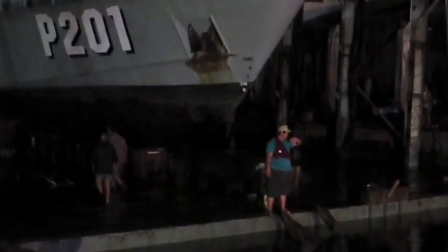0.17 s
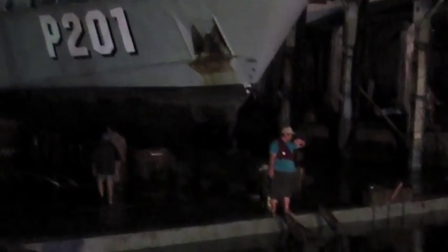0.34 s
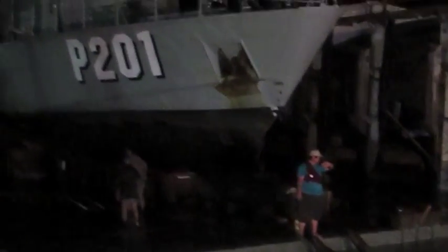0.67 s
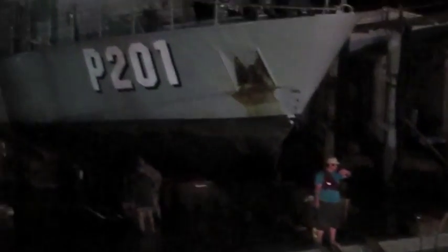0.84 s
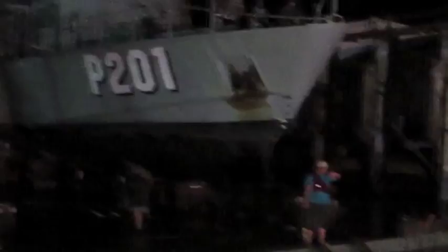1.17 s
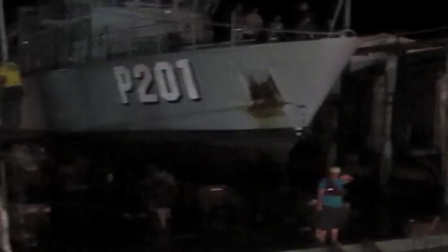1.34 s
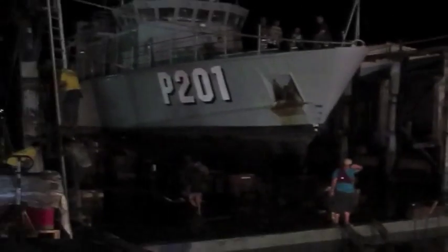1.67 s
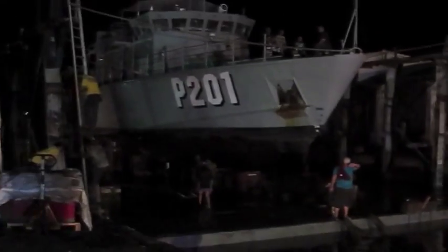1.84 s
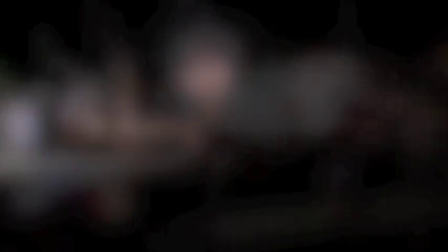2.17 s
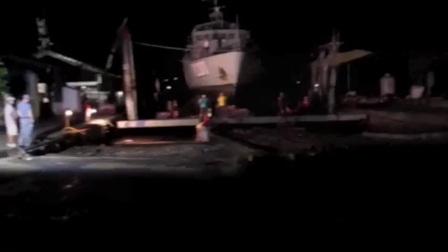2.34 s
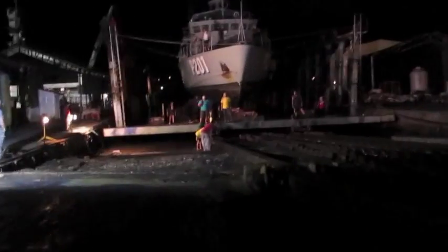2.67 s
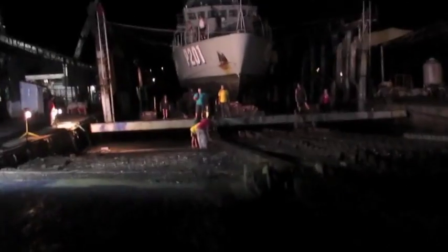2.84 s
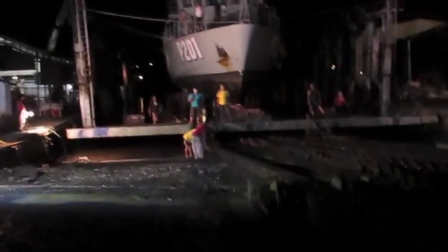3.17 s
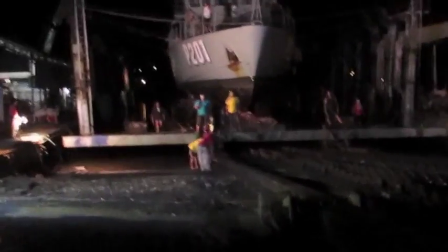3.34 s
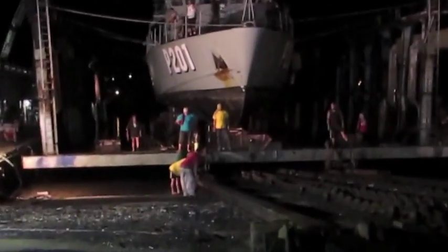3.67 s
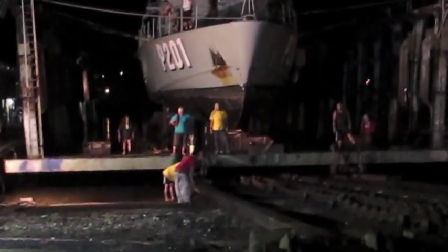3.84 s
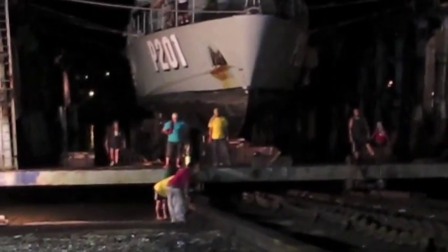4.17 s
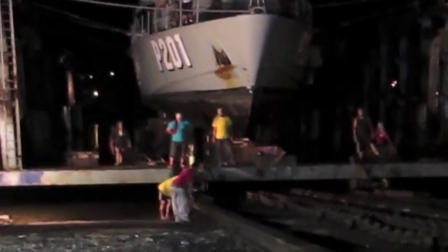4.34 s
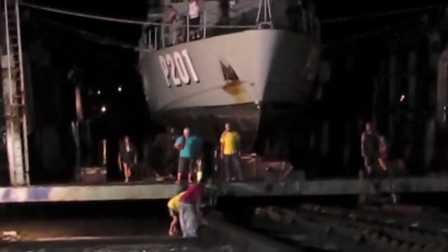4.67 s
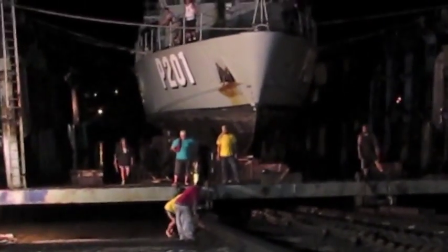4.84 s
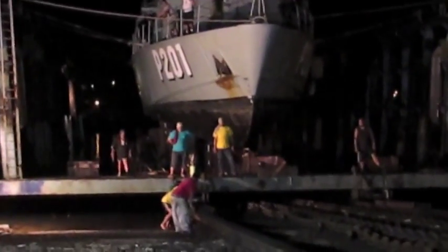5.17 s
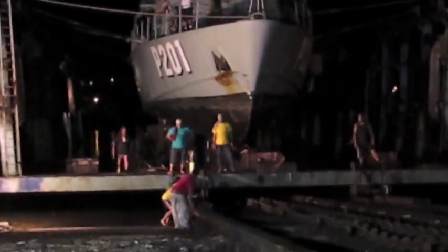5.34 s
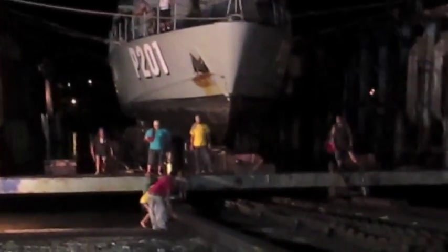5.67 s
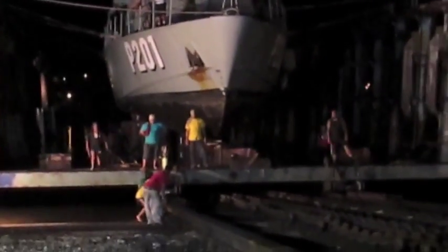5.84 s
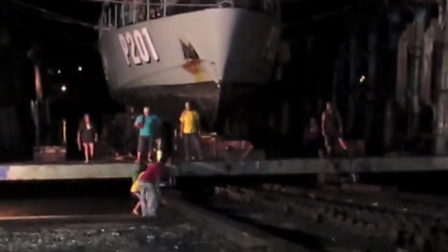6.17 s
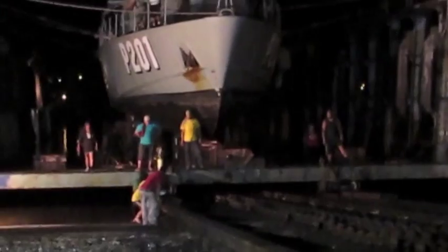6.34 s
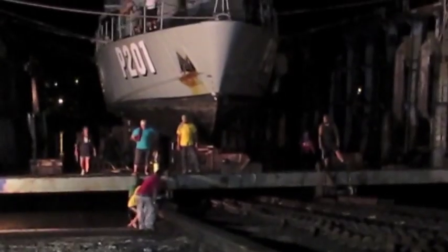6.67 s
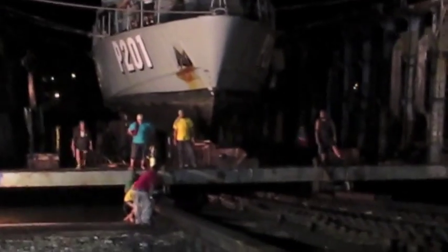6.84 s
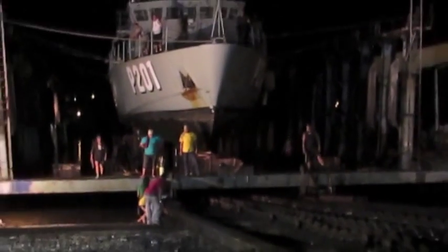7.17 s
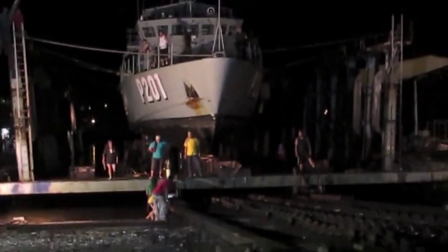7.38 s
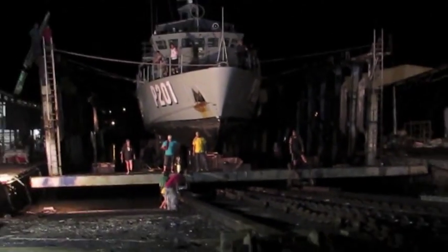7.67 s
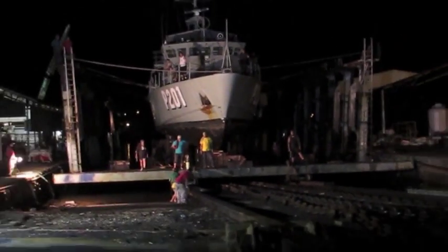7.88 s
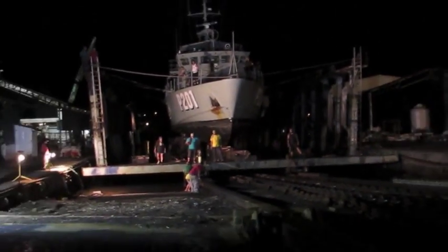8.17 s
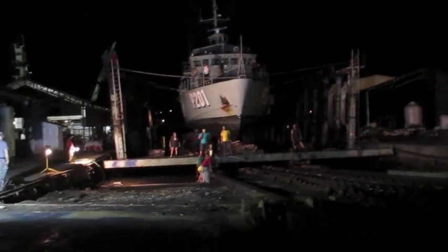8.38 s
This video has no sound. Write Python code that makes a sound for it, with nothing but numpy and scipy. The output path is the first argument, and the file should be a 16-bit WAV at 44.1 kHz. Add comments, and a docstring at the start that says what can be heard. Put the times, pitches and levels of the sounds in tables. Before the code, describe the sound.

Outdoors at a shipyard slipway, a close winch roar with a hollow drone quickly fades to a distant rush while wind thuds and flutters on the microphones, mostly the left. Small dry ticks of fingers on the camera follow. Around two seconds the sound crossfades to a heavy winch close by, roaring steadily with a wavering mid-pitched whine. One loud click comes later; the winch continues unbroken.

```python
"""Winch on a windy slipway

A loud winch close by fades to a distant rush and a few tones, with wind buffeting both microphone ports.
Then the close winch fades in: shaped noise for motor, gears and air, sine tones for drive and gear mesh.
Fingers tick on the camera body (ringing modes and a noise crack), with a steady hum and hiss underneath.
Sharp bright peaks pull the recorder's gain down for a moment.
"""
import sys
import numpy as np
from scipy import signal
from scipy.fft import rfft, irfft, next_fast_len
from scipy.io import wavfile

SR = 44100
rng = np.random.default_rng(int(sys.argv[2]) if len(sys.argv) > 2 else 0)


def file_out(sig):
    """Save sig as 16-bit WAV at sys.argv[1]."""
    # one column per channel
    cols = np.atleast_2d(sig).T
    # limit, then scale
    lim = np.clip(cols, -1, 1)
    pcm = np.round(lim * 32767).astype(np.int16)
    wavfile.write(sys.argv[1], SR, pcm)


N = 375291

# Noise of the close winch, only its shape counts: (frequency [Hz], relative level per Hz [dB])
ROAR_SPECTRUM = [(20, -21), (60, -11), (120, -2.5), (200, 1), (500, -4), (900, -9), (1800, -14.5),
                 (2900, -26.5), (5300, -28), (7000, -34), (9000, -42.5), (11000, -53), (14000, -64.5),
                 (15300, -69)]
# Tones of the drive: (multiple of the shaft rate [-], level against the close roar [dB])
DRIVE_TONES = [(2, -27.5), (6, -25.5), (8, -19), (11, -24.5), (14, -21), (19, -22), (20, -24.5), (22, -24),
               (32, -32), (34, -43), (36, -31.5), (37, -39), (38, -36), (39, -35.5), (40, -26.5), (53, -40),
               (54, -26)]
# Close tones unrelated to the shaft: (frequency [Hz], level against the close roar [dB], pitch wander [Hz])
OTHER_TONES = [(41.4, -36, 1.1), (80.9, -18.5, 0.67), (161.5, -20.5, 1.54), (190.9, -14.5, 1.89),
               (423.7, -14.5, 2.5), (466, -12.5, 12), (8600, -54, 9.1)]
# Hollow band of noise in the opening: (frequency [Hz], level against the opening roar [dB], width [Hz])
OPENING_DRONE = (790, -13, 77)
# Noise of the distant winch, only its shape counts: (frequency [Hz], relative level per Hz [dB])
RUSH_SPECTRUM = [(60, -7), (300, 6.5), (700, -1), (900, -5), (1400, -5.5), (1800, -9.5), (2900, -16),
                 (4000, -21), (5300, -19), (7000, -23.5), (9000, -32), (11000, -48.5), (14000, -53),
                 (15300, -59)]
# Tones that carry to the far place: (frequency [Hz], level against the far rush [dB], pitch wander [Hz])
FAR_TONES = [(1375, -24, 2.5), (1615, -19.5, 2.0)]
# Brief extra treble in the rush:
# (centre [s], time to fall by a factor e [s], treble added against the rush's own [dB], above [Hz])
TREBLE_SWELL = (.24, .05, 2.2, 2600)
# Gusts on the two microphone ports: (time [s], left level [dB], right level [dB])
GUSTS = [(0.0, -20, -17), (0.07, -23, -24), (0.14, -24, -30), (0.21, -16, -28), (0.28, -14, -20.8),
         (0.35, -15.5, -26), (0.42, -17.5, -25.6), (0.49, -19.5, -22), (0.56, -19, -24), (0.63, -17, -22),
         (0.7, -17.5, -24), (0.77, -19, -30), (0.84, -23, -20), (0.91, -22.3, -20.5), (0.98, -19, -26),
         (1.05, -18, -25), (1.12, -21.5, -37), (1.19, -20, -28), (1.26, -22, -25), (1.33, -16, -27),
         (1.4, -15.5, -16.5), (1.47, -15, -14.5), (1.54, -15, -19), (1.61, -14.5, -25), (1.68, -18.5, -18),
         (1.75, -20.5, -26), (1.82, -16, -19), (1.89, -22, -21.5), (1.96, -16.5, -11.5), (2.03, -22.5, -31),
         (2.1, -18, -16), (2.17, -27, -24), (2.3, -27, -40)]
# Noise of the wind, only its shape counts: (frequency [Hz], relative level per Hz [dB])
BUFFET_SPECTRUM = [(15, -10), (30, -10), (80, -0.5), (140, -2.5), (220, -7), (330, -12.5), (500, -23.5),
                   (800, -41), (1500, -49), (3000, -75)]
# Single hard puffs of wind: (time of the deepest swing [s], peak [dB], left over right [dB],
# swing frequency [Hz], direction: 1 pushes in, -1 sucks out [-])
PUFFS = [(0.19, -5.5, 20, 91, 1), (0.227, -7, 20, 85, -1), (.26, -9, 20, 150, 1), (0.284, 0, 13, 118, -1),
         (0.326, -2.5, 26, 88, -1), (.534, -6, 15, 100, 1), (0.663, -1, 22, 95, -1), (.739, 0, 26, 110, 1),
         (0.812, -8, 20, 120, -1), (0.901, -10, -14, 100, 1), (0.999, -4, 22, 130, 1),
         (1.362, -6, 14, 150, -1), (1.418, -7, 10, 130, -1), (1.462, -9, -1, 130, 1), (1.51, -5, 4, 110, 1),
         (1.54, -2, 14, 120, 1), (1.589, -6.5, 14, 140, 1), (1.626, -6.5, 10, 170, -1),
         (1.71, -8.5, 4, 114, 1), (1.788, -4.5, 12, 100, -1), (1.806, -5, 12, 100, -1),
         (1.829, -8, 14, 125, 1), (1.943, -3, -12, 109, -1)]
# Gear-mesh tone close by, before its quick flutter: (time [s], rms level [dB])
WHINE_LEVEL = [(2.2, -25.5), (2.55, -19.5), (2.85, -20), (2.97, -23), (3.05, -21.5), (3.35, -23),
               (3.42, -21), (3.55, -27), (4.06, -22.5), (4.22, -24.5), (4.28, -22), (4.91, -20),
               (4.98, -19.5), (5.03, -20), (5.65, -19.5), (5.86, -22.5), (6.08, -19), (6.32, -23),
               (6.45, -18), (6.95, -24.5), (7.6, -20.5), (7.81, -19.5), (8.27, -19), (8.51, -20.5)]
# A neighbouring tone that swells: (start [s], end [s], frequency [Hz], rms level when full [dB])
TONE_SWELL = (2.97, 3.26, 658, -28.5)
# Ticks on the camera body: (time [s], peak before gain control [dB], brightness [dB per octave],
# time for the rattle to fall 60 dB [s], place struck: 0 edge, 1 top, 2 side [-])
TICKS = [(.7305, -23, -5, .015, 0), (.795, -34, 0, .05, 0), (.882, -25, 0, .025, 0),
         (.938, -25, 2, .025, 0), (1.034, -30, 1, .08, 0), (1.063, -5, 0, .02, 1),
         (3.7467, 0.5, -2, .014, 2)]
# Ringing modes of the camera body: (frequency [Hz], time to fall 60 dB [s],
# edge left [dB], edge right [dB], top left [dB], top right [dB], side left [dB], side right [dB])
BODY_MODES = [(1120, .008, -14, -8, -13, -2, -20, -20), (2050, .007, -9, -9, -6, -12, -4, -9),
              (2400, .007, -3, -1, -2, -14, -5, 0), (2780, .008, -9, -2, -10, -1, -18, 0),
              (3700, .006, -9, -8, -15, -18, -5, -26), (4200, .007, -18, -5, -18, -10, -20, -20),
              (4750, .006, -17, -11, -18, -22, -20, -4), (5500, .005, -9, -13, -18, -16, -12, -4),
              (6300, .005, -16, -9, -16, -6, -23, -14), (8250, .004, -32, -17, -22, -1, -36, -13),
              (9200, .004, -36, -13, -27, -13, -40, -18), (10000, .004, -38, -22, -34, -18, -40, -18),
              (11000, .003, -40, -28, -34, -20, -44, -28), (13300, .002, -44, -36, -32, -24, -48, -14)]
# The two microphone ports:
# (frequency [Hz], left over right [dB], likeness from 0 to 1 [-], phase by which right leads [radians])
PORTS = [(60, 0, 1, 0), (500, -.5, .98, .12), (1200, -.5, .9, .2), (2100, 0, .78, .3),
         (2700, 2.5, .27, 1.0), (3200, 2.5, .5, .8), (3800, 2.5, .27, 1.3), (5000, 2.4, .35, 2.4),
         (6000, 3.7, .42, 3.3), (7000, -1.2, .38, 4.4), (8000, -7.8, .3, 5.2), (9000, -12, .2, 4.6),
         (10000, -13.4, .16, 4.3), (12000, -12, .07, 4.3), (14500, -9, .03, 4.3)]
# Fade from the far place to the close one: (start [s], end [s])
CROSSFADE = (1.97, 2.56)

SHAFT_HZ, MESH_ORDER = 29.9, 18   # the gear mesh sounds at 18 times the shaft rate
OPENING_FADE_START_S, OPENING_FADE_END_S, OPENING_DB = 0.23, 0.43, -28.5
NEAR_DB, NEAR_SWELLS_DB_PER_S = -18.5, 0.0643   # level at time zero, then a slow growth
FAR_DB, FAR_SINKS_DB_PER_S = -33.5, 1.3         # level at time zero, then a slow sinking
FAR_WHINE_DB, WHINE_FLUTTER_DB = -45.5, 1.5
HUM_HZ, FAR_HUM_DB, NEAR_HUM_DB = 99.9, -33.5, -33   # mains hum at twice the line frequency
HISS_DB = -80
PUFF_SWINGS = 0.58   # swings in which the inner envelope grows or dies by a factor e
CRACK_DB, CRACK_BOTTOM_HZ, CRACK_TOP_HZ = -10, 800, 4000   # noise level before band limiting
TICK_LEAD_SHARE = 0.4   # share of the ports' phase lead kept by a tick through the body
LIMIT_DB, RELEASE_DB_PER_S, ATTACK_S, SENSE_ABOVE_HZ = -6, 18, 0.004, 1500
CUTOFF_HZ = 15700

CONTROL_STEP = 40   # samples between two values of a slow control
TIME = np.arange(N) / SR
SIZE = next_fast_len(N)
HZ = np.maximum(np.arange(SIZE // 2 + 1) * SR / SIZE, 1)


def from_db(db):
    """Turn decibels into gain."""
    return 10 ** (np.asarray(db) / 20)


def rms_one(x):
    """Scale to an rms of 1."""
    return x / np.sqrt(np.mean(np.abs(x) ** 2) + 1e-20)


def in_time(rows):
    """Read the columns of a time table at every sample."""
    s, *columns = np.transpose(rows)
    return [np.interp(TIME, s, column) for column in columns]


def at_hz(rows, hz):
    """Read the columns of a frequency table, on a logarithmic axis as for musical pitch."""
    table_hz, *columns = np.transpose(rows)
    return [np.interp(np.log(hz), np.log(table_hz), column) for column in columns]


def fade_in(start_s, end_s):
    """A straight rise of gain from 0 to 1."""
    return np.clip((TIME - start_s) / (end_s - start_s), 0, 1)


def drift(rate_hz):
    """Slow random wandering with an rms of 1; a higher rate makes it quicker."""
    r = np.exp(-2 * np.pi * rate_hz * CONTROL_STEP / SR)
    chance = rng.standard_normal(N // CONTROL_STEP + 2002)
    wandering = signal.lfilter([1], [1, -2 * r, r * r], chance)
    return rms_one(wandering[2000:])   # skip the filter's start-up


def smooth(slow):
    """Stretch a slow control to every sample."""
    return np.interp(np.arange(N) / CONTROL_STEP, np.arange(len(slow)), slow)


def highpass(x, hz):
    """Keep what lies above a frequency."""
    return signal.sosfilt(signal.butter(2, hz, "high", fs=SR, output="sos"), x)


def stereo_noise(spectrum, lead_share, patchy_db):
    """Coloured noise, partly alike at the two ports, whose octave bands each flicker; rms 1."""
    tilt_db, alike, lead = at_hz(PORTS, HZ)
    one, other = rfft(rng.standard_normal((2, SIZE)))
    right = alike * np.exp(1j * lead * lead_share) * one + np.sqrt(1 - alike ** 2) * other
    pair = np.array([one * from_db(tilt_db / 2), right * from_db(-tilt_db / 2)])
    pair = pair * from_db(at_hz(spectrum, HZ)[0])
    out, together = 0, drift(8.9)
    for octave in np.arange(4, 15):   # band centres are 2 ** octave Hz
        band = np.clip(1 - np.abs(np.log2(HZ) - octave), 0, 1)   # neighbouring slopes sum to one
        flicker = smooth(from_db(patchy_db * (1.8 * together + drift(12.0))))
        out = out + irfft(pair * band, SIZE)[:, :N] * flicker
    return rms_one(out)


def tone(hz, wander_hz, waver_db):
    """A sine of about rms 1 with wandering pitch and wavering level, tilted and shifted between ports."""
    tilt_db, _, lead = at_hz(PORTS, hz)
    wander = smooth(np.cumsum(drift(6.0)) * wander_hz * CONTROL_STEP / SR)
    phase = 2 * np.pi * (hz * TIME + wander + rng.random())
    pair = np.sin(phase + [[-lead / 2], [lead / 2]])
    pair = pair * from_db([[tilt_db / 2], [-tilt_db / 2]])
    return np.sqrt(2) * pair * smooth(from_db(waver_db * drift(0.68)))


def near_winch():
    """Motor, gears and cooling air make a broad roar; turning parts add tones at multiples of the shaft rate."""
    sound = stereo_noise(ROAR_SPECTRUM, lead_share=0.93, patchy_db=0.21)
    for order, db in DRIVE_TONES:
        sound = sound + from_db(db) * tone(order * SHAFT_HZ, 0.6, waver_db=2.5)
    for hz, db, wander_hz in OTHER_TONES:
        sound = sound + from_db(db) * tone(hz, wander_hz, waver_db=3)
    return sound


def opening_drone():
    """Noise through one resonance sounds hollow; it is the same at both ports."""
    hz, level_db, width_hz = OPENING_DRONE
    r = np.exp(-np.pi * width_hz / SR)
    resonance = [1, -2 * r * np.cos(2 * np.pi * hz / SR), r * r]
    band = signal.lfilter([1, 0, -1], resonance, rng.standard_normal(N))
    return from_db(level_db) * rms_one(band)


def far_winch():
    """From a distance only a slowly sinking rush and a few tones carry; the treble swells briefly."""
    rush = stereo_noise(RUSH_SPECTRUM, lead_share=0.59, patchy_db=0.6)
    centre_s, fall_s, swell_db, above_hz = TREBLE_SWELL
    swell = from_db(swell_db) * np.exp(-((TIME - centre_s) / fall_s) ** 2)
    sound = rush + swell * highpass(rush, above_hz)
    for hz, db, wander_hz in FAR_TONES:
        sound = sound + from_db(db) * tone(hz, wander_hz, waver_db=3.5)
    return from_db(FAR_DB - FAR_SINKS_DB_PER_S * TIME) * sound


def wind():
    """Eddies burst on each port on their own: lumpy low noise that follows the gusts."""
    lumps = [smooth(from_db(2.0 * drift(rate_hz))) for rate_hz in (28.0, 24.0)]
    noise = rng.standard_normal((2, N)) * lumps
    low = irfft(rfft(noise, SIZE) * from_db(at_hz(BUFFET_SPECTRUM, HZ)[0]), SIZE)[:, :N]
    return rms_one(low) * from_db(in_time(GUSTS))


def hum(near):
    """Steady electrical hum of the yard, one low sine with a gently wavering level."""
    level = near * from_db(NEAR_HUM_DB) + (1 - near) * from_db(FAR_HUM_DB)
    return level * tone(HUM_HZ, 0.54, waver_db=1.5)


def hiss():
    """The recorder's own faint white noise, the same in both channels."""
    return from_db(HISS_DB) * rng.standard_normal(N)


def puffs():
    """A puff rocks the microphone membrane: a swing grows to a pointed peak and dies the same way."""
    out = np.zeros((2, N))
    for s, peak_db, pan_db, hz, push in PUFFS:
        half = round(1.5 * SR / hz)   # one and a half swings on each side
        turn = np.arange(-half, half) * hz / SR
        envelope = np.exp(-np.abs(turn) / PUFF_SWINGS) * np.hanning(2 * half)
        swing = np.cos(2 * np.pi * turn) * envelope * np.sign(push)
        ports_db = peak_db + np.minimum([[pan_db], [-pan_db]], 0)   # only the weaker port is lowered
        at = round(s * SR) - half
        out[:, at:at + 2 * half] += swing * from_db(ports_db)
    return out


def whine(near, far):
    """Meshing gear teeth give one almost pure tone; a neighbouring tone swells briefly."""
    level = near * from_db(in_time(WHINE_LEVEL)[0]) + far * from_db(FAR_WHINE_DB)
    flutter = smooth(from_db(WHINE_FLUTTER_DB * drift(10.0)))
    mesh = level * flutter * tone(MESH_ORDER * SHAFT_HZ, 0.31, waver_db=0)
    start_s, end_s, hz, level_db = TONE_SWELL
    swell = np.clip(np.minimum(TIME - start_s, end_s - TIME) / 0.05, 0, 1)   # 0.05 s ramps
    return mesh + from_db(level_db) * swell * tone(hz, 1, waver_db=0)


def ticks():
    """A tap makes a dry crack and rings the body's modes, with other strengths at each port."""
    out = np.zeros((2, N))
    t = np.arange(round(0.05 * SR)) / SR
    hz, t60, *ports_db = np.transpose(BODY_MODES)
    hz_column = hz[:, None]
    lead = TICK_LEAD_SHARE * at_hz(PORTS, hz)[2]
    crack_band = signal.butter(2, [CRACK_BOTTOM_HZ, CRACK_TOP_HZ], "band", fs=SR, output="sos")
    for s, peak_db, bright_db, rattle_s, place in TICKS:
        level_db = np.array(ports_db[2 * place:2 * place + 2])
        chance_db = rng.normal(0, 0.6, (2, len(hz)))
        strength = from_db(level_db + bright_db * np.log2(hz / 2500) + chance_db)
        phase = 2 * np.pi * rng.random((len(hz), 1)) + np.outer([-0.5, 0.5], lead)[:, :, None]
        modes = from_db(-60 * t / t60[:, None]) * np.sin(2 * np.pi * hz_column * t + phase)
        modes = modes * (1 - np.exp(-(t * hz_column / 2.5) ** 2))   # low modes speak later
        ring = (strength[:, :, None] * modes).sum(axis=1)
        rattle = rng.standard_normal((2, len(t))) * from_db(CRACK_DB - 60 * t / rattle_s)
        crack = signal.sosfilt(crack_band, rattle)
        sound = (ring + crack) * (1 - np.exp(-(t / 0.0003) ** 2))   # soften the very first instant
        at = round(s * SR)
        out[:, at:at + len(t)] += sound * from_db(peak_db) / np.abs(sound).max()
    return out


def scene():
    """The close opening gives way to the windy far place, which fades over to the close winch."""
    near = fade_in(*CROSSFADE)
    opened = fade_in(OPENING_FADE_START_S, OPENING_FADE_END_S)
    opening = from_db(OPENING_DB) * (1 - opened)
    near_level = from_db(NEAR_DB + NEAR_SWELLS_DB_PER_S * TIME) * near
    close = (near_level + opening) * near_winch() + opening * opening_drone()
    far = (1 - near) * (far_winch() + wind() + puffs())
    return close + far + hum(near) + hiss() + whine(near, opened - near) + ticks()


def record(dry):
    """Gain control ducks on bright peaks and recovers steadily; what gets past clips; the top is cut."""
    loudest = np.abs(highpass(dry, SENSE_ABOVE_HZ)).max(axis=0)
    over_db = np.maximum(20 * np.log10(loudest + 1e-9) - LIMIT_DB, 0)
    release_db = RELEASE_DB_PER_S * TIME
    held_db = np.maximum.accumulate(over_db + release_db) - release_db   # falls at the release rate
    r = np.exp(-1 / (ATTACK_S * SR))
    duck_db = signal.lfilter([1 - r], [1, -r], held_db)   # the gain follows with a short lag
    clipped = np.clip(dry * from_db(-duck_db), -1, 1)
    return signal.sosfilt(signal.cheby2(12, 70, CUTOFF_HZ, fs=SR, output="sos"), clipped)


dry = scene()
out = record(dry)
file_out(out)
```